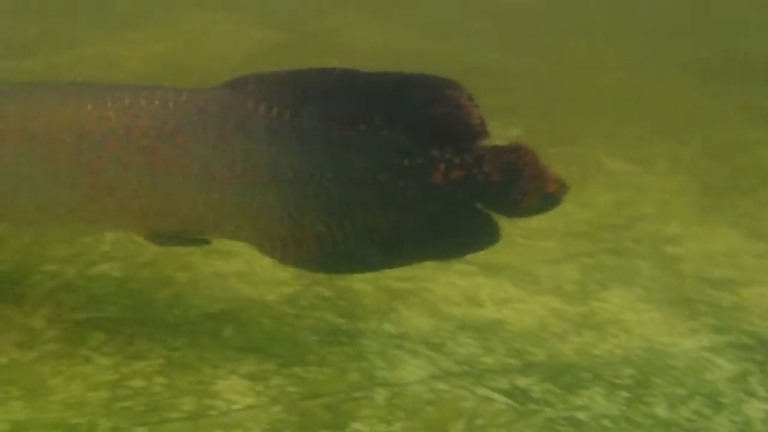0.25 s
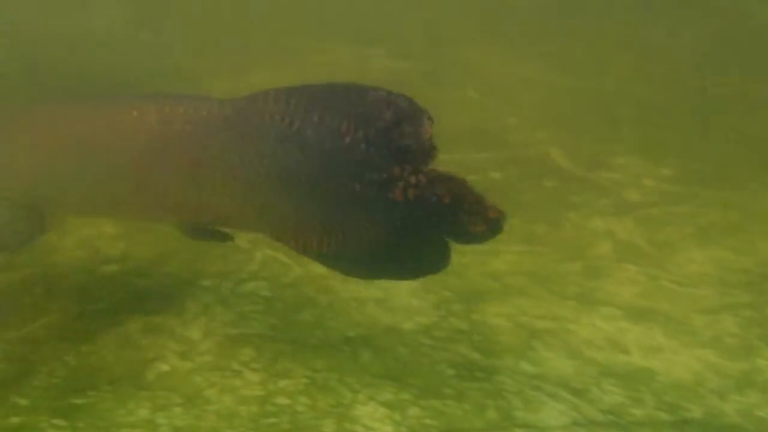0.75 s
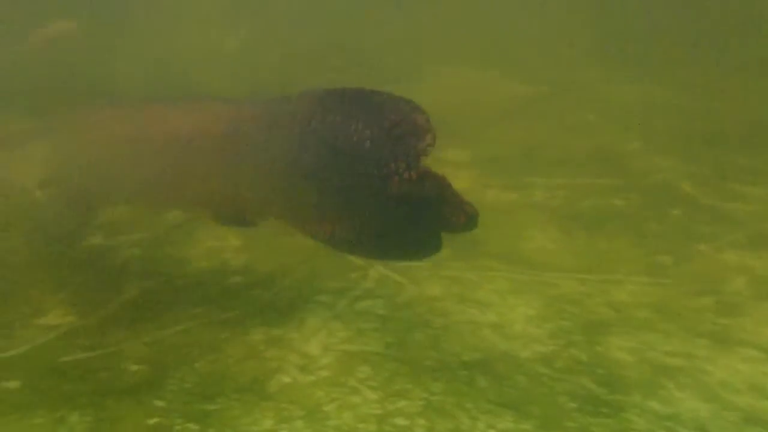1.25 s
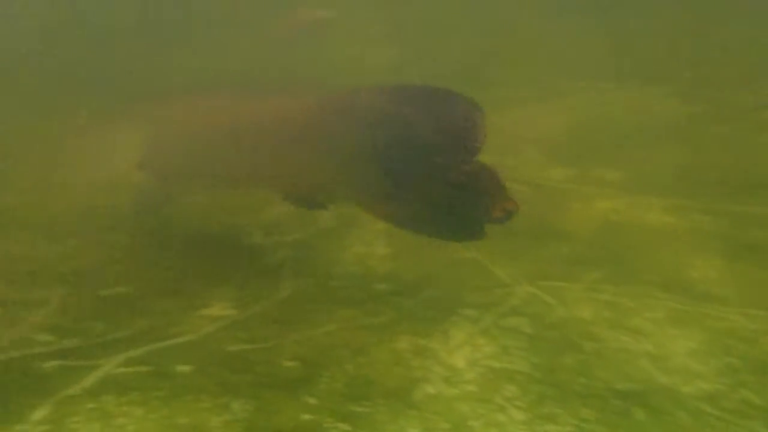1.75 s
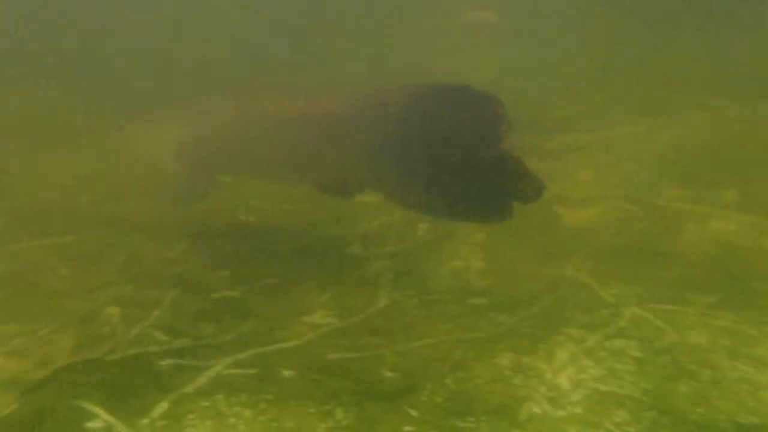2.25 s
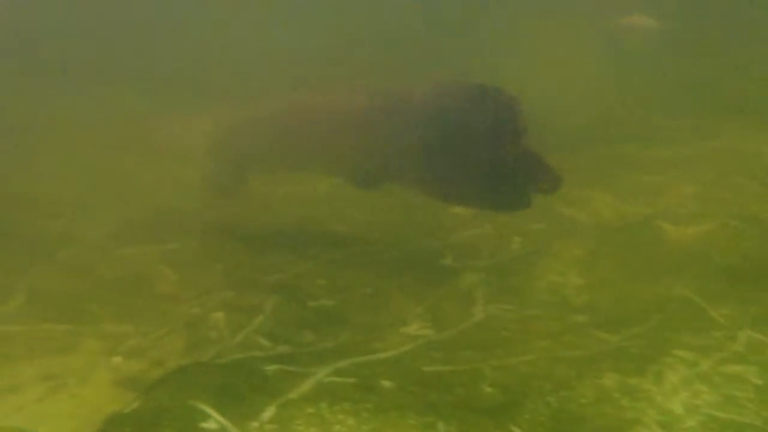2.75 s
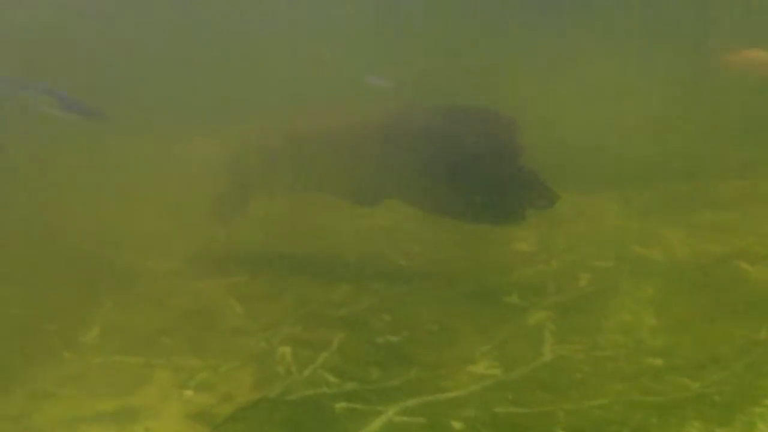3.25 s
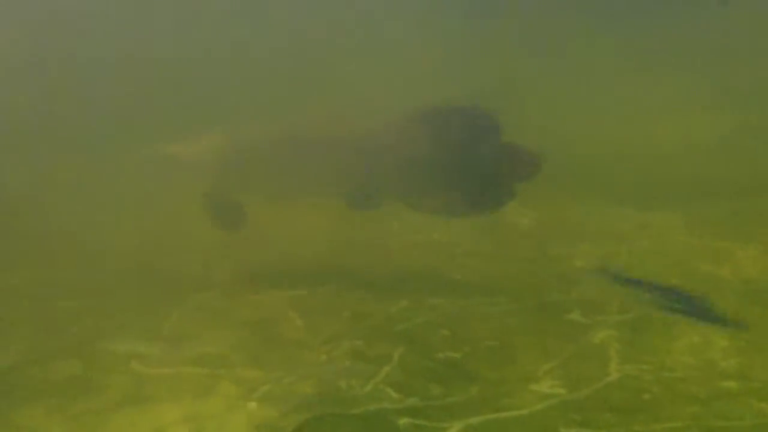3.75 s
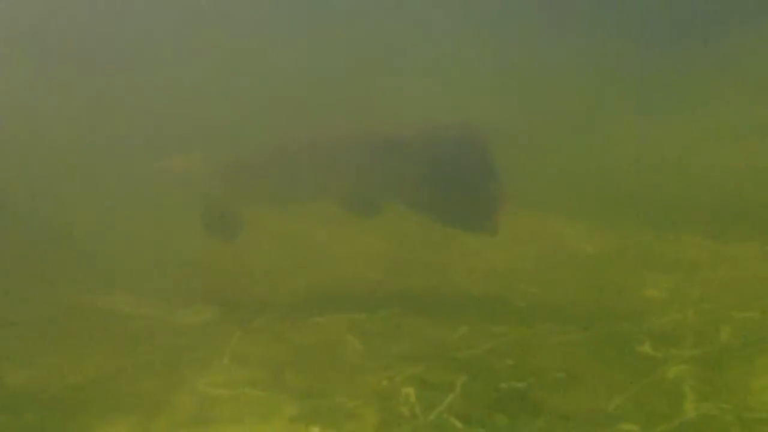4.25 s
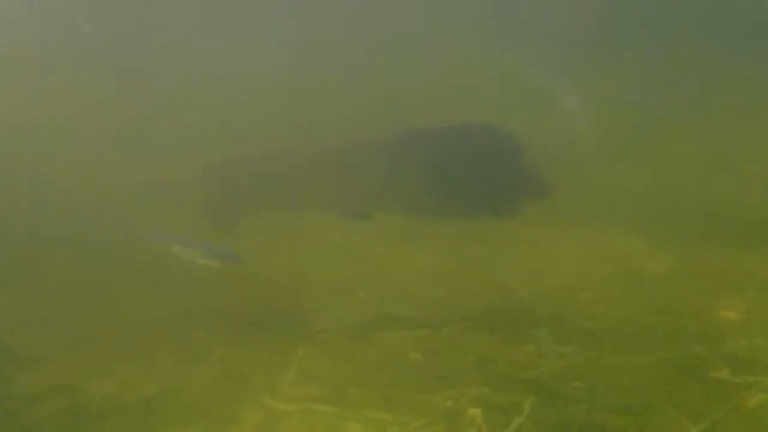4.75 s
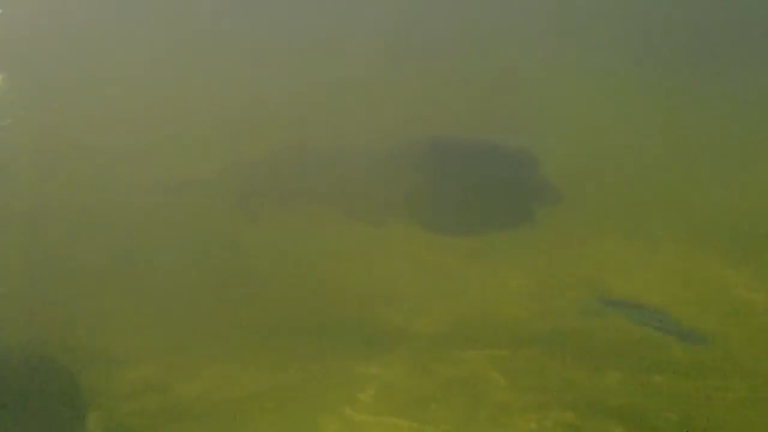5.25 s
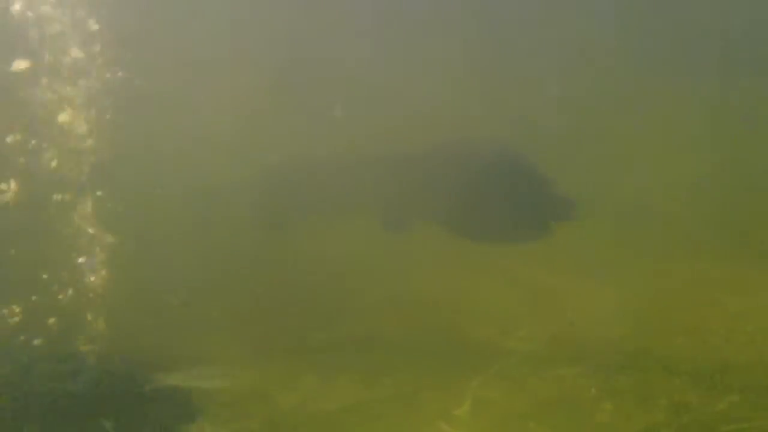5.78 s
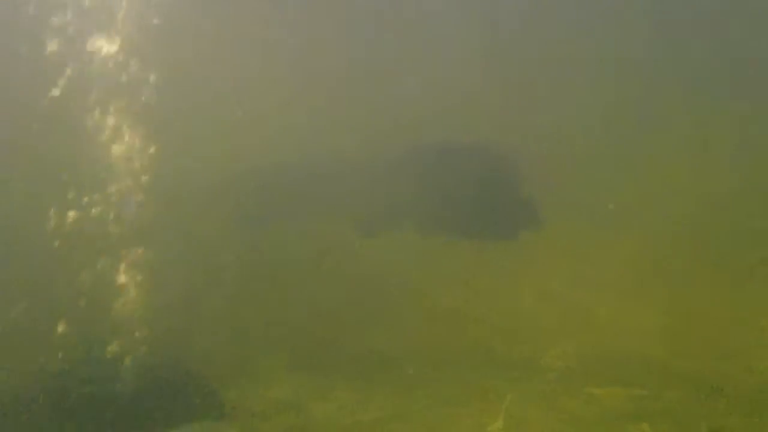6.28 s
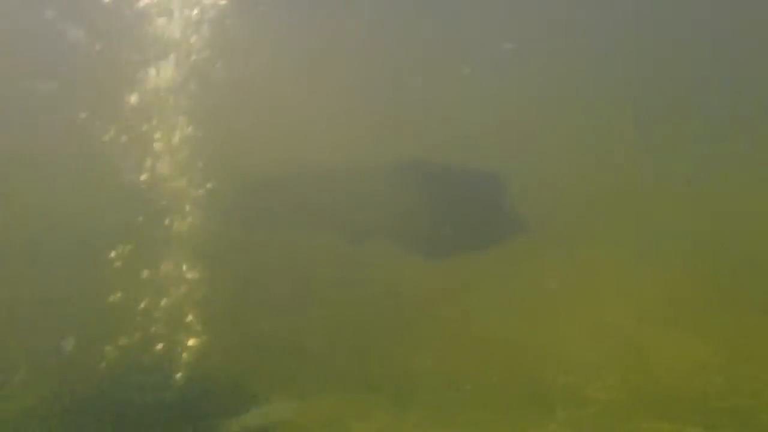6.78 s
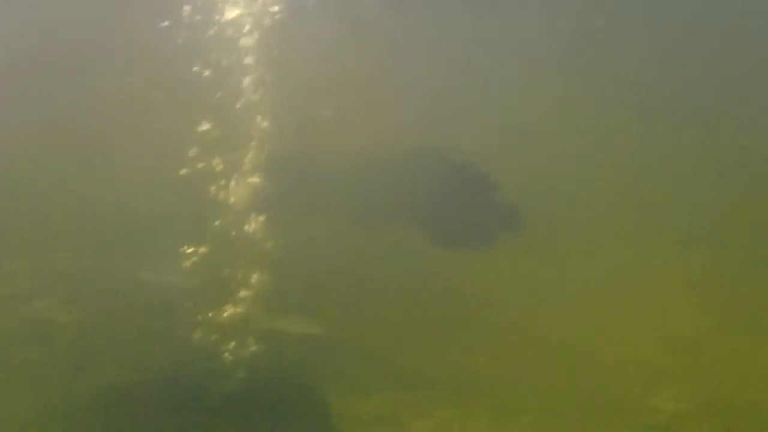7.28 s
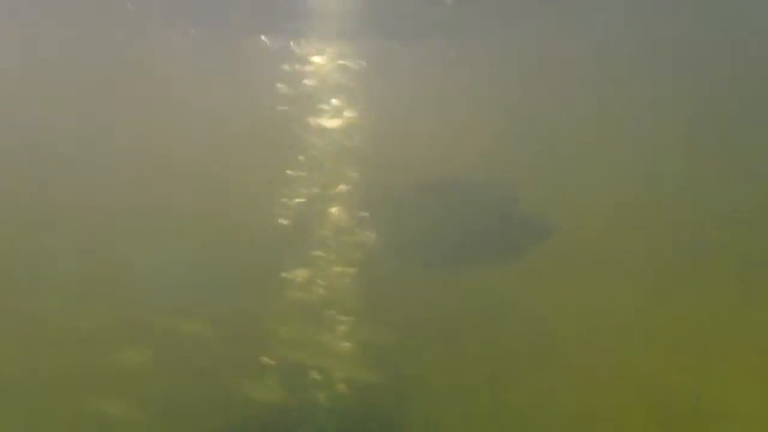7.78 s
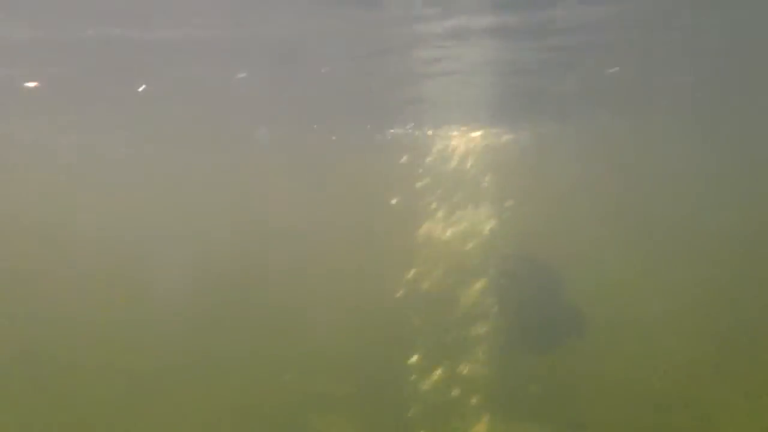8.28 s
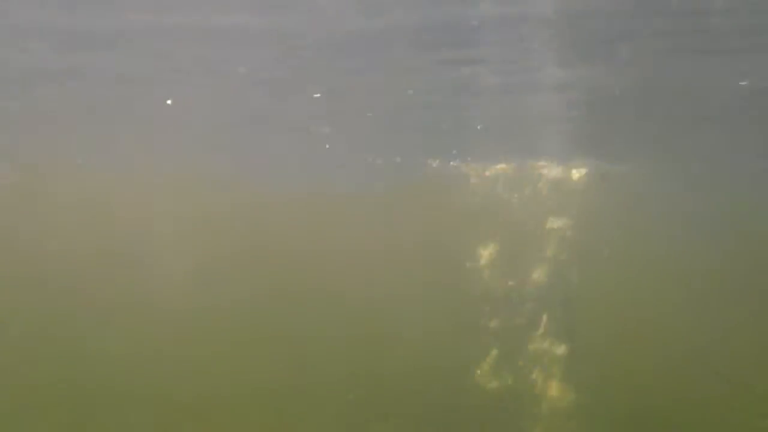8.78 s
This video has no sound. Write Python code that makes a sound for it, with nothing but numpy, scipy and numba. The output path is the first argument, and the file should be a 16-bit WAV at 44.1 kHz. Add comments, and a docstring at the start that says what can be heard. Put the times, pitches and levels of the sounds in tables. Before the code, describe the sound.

A stream of air bubbles rises in a fish tank, heard from a camera held underwater in its housing. Distinct, briefly ringing plinks pop irregularly over a continuous burble and fizz, with a low water rumble beneath. A low motor hums briefly at the start and again near the middle. Fingers bump the case softly, and four sharp knocks land along the way, the last near the end.

```python
"""An aerator's bubble stream in a fish tank, heard from a camera held under water in its housing.
Each bubble rings briefly, echoes between walls and surface and takes on the housing's resonances:
distinct plinks over a bed of burble and fizz. Water rumbles on the case, a motor hums twice,
the electronics hiss faintly, fingers bump the case, and sharp knocks make the limiter duck."""
import sys
import numpy as np
from scipy import signal
from scipy.fft import rfft, irfft
from scipy.io import wavfile
from scipy.ndimage import uniform_filter1d, minimum_filter1d
from numba import njit

SR = 44100
rng = np.random.default_rng(int(sys.argv[2]) if len(sys.argv) > 2 else 0)


def transcribe(signal):
    """Save signal, clipped to [-1, 1], as a 16-bit WAV file at the path in sys.argv[1]."""
    frames = np.atleast_2d(signal).T
    limited = np.clip(frames, -1, 1)
    pcm = np.round(limited * 32767).astype(np.int16)
    wavfile.write(sys.argv[1], SR, pcm)


N = 398223
TIME = np.arange(N) / SR
RING_TIME = np.arange(4096) / SR  # time axis of one short sound or echo tail
TOP_HZ = 14400

# resonances of the housing: (frequency [Hz], width [Hz], level [dB])
HOUSING_MODES = [(1042, 143, -14), (1183.8, 71, 2), (1392, 83, 0.5), (1574, 250, -3.5), (1584, 97, -11),
                 (2054, 138, -15), (2395, 154, -18.5), (2748, 154, -23), (3720, 545, -21),
                 (4280, 500, -23.5), (5490, 990, -21), (6040, 220, -20.5), (7100, 17000, -33.5)]
# steady air flow, its burble easing a little as the camera turns: (time [s], level [dB])
BURBLE_LEVEL = [(0, -26), (2.7, -23.5), (6.5, -25), (9.03, -28)]
# water moving along the case, strongest as the camera swings up at the end: (time [s], flow [dB])
WATER_FLOW = [(0, 3.5), (1.4, 5), (3.2, 0.5), (4.8, -6), (5.6, 2.5), (7.1, 0.5), (7.7, 7), (9.03, 8.5)]
# deep sway of the water: (frequency [Hz], relative level [dB])
SWAY_SPECTRUM = [(8, -2.5), (25, 5.5), (55, -6), (80, -9), (160, -35), (1000, -100)]
# eddies on the case: (frequency [Hz], relative level [dB])
EDDY_SPECTRUM = [(25, -20.5), (65, 5), (115, -1.5), (150, 2.5), (195, -7.5), (240, -13.5), (330, -15),
                 (450, -34.5), (1500, -78.5)]
# midrange slosh: (frequency [Hz], relative level [dB])
SLOSH_SPECTRUM = [(120, -5), (290, -5.5), (420, -4), (620, -4), (850, -4.5), (1300, -3), (4000, -58)]
# runs of the motor: (start [s], end [s], pitch [Hz], hum level [dB])
MOTOR_RUNS = [(0, 0.953, 49.46, -21.5), (3.827, 4.452, 50.5, -26.5)]
# the motor's rattle in the case: (frequency [Hz], relative level [dB])
RATTLE_SPECTRUM = [(40, -16), (100, 2.5), (145, 3), (210, 1), (270, -33.5), (345, -8), (430, -41),
                   (1500, -68.5)]
# faint whine of the electronics: (frequency [Hz], level [dB])
WHINE_TONES = [(8091, -97), (8151.5, -68), (8212, -65), (8273, -78), (8333, -73)]
# their hiss: (frequency [Hz], relative level [dB])
HISS_SPECTRUM = [(100, -8.5), (7000, 1.5), (10000, -1.5), (14000, -1.5)]
# the loudest bubbles, each a distinct plink: (time [s], pitch [Hz], relative peak [dB])
LOUD_BUBBLES = [(0.009, 1210, -9.5), (0.163, 2060, -18.5), (0.183, 1260, -13.5), (0.224, 2200, -20),
                (0.257, 2230, -16), (0.492, 1310, -9.5), (0.728, 1163, -4), (0.742, 1168, -4.5),
                (0.879, 1470, -7.5), (1.145, 2130, -13), (1.266, 2040, -11), (1.266, 2810, -14.5),
                (1.371, 1260, -7.5), (1.401, 1192, -10), (1.443, 1630, -7), (1.579, 1436, -7),
                (1.647, 1226, -10), (1.741, 1213, -11), (1.852, 6080, -16), (2.072, 1650, -8),
                (2.107, 6100, -22), (2.11, 3170, -21), (2.147, 1230, -9.5), (2.18, 1420, -9),
                (2.252, 3200, -19), (2.396, 1557, -1.5), (2.422, 1133, -10.5), (2.468, 1590, -4.5),
                (2.662, 1375, -9), (2.697, 1180, -13.5), (2.713, 2100, -15.5), (2.715, 1410, -12.5),
                (2.821, 1525, -11.5), (2.935, 1550, -9.5), (3.094, 1860, -11), (3.175, 1530, -10),
                (3.219, 1190, -11), (3.222, 1860, -9), (3.253, 1630, -8), (3.391, 1420, -11),
                (3.461, 1110, -12.5), (3.499, 1185, -2.5), (3.555, 1064, -6), (3.631, 1180, -6.5),
                (3.918, 2710, -20), (3.995, 6370, -22), (4.032, 3930, -23.5), (4.044, 1570, -13),
                (4.082, 2480, -8.5), (4.349, 1590, -13), (4.401, 1360, -12), (4.437, 5800, -23.5),
                (4.632, 6230, -23), (4.761, 1770, -12.5), (4.786, 1414, -8), (4.895, 1760, -5),
                (5.238, 1620, -11.5), (5.324, 4740, -17.5), (5.482, 1450, -14), (5.87, 1240, -10),
                (5.876, 3440, -21.5), (5.974, 3250, -19.5), (6.021, 1197, -10.5), (6.103, 1193, -5),
                (6.196, 3350, -20.5), (6.237, 1586, -14.5), (6.275, 1540, -8), (6.281, 1130, -11),
                (6.327, 1112, -11.5), (6.361, 1308, -5.5), (6.558, 1770, -5), (6.622, 1810, -2.5),
                (6.768, 1190, -12.5), (6.941, 1148, -9), (7.066, 1550, -13.5), (7.097, 1150, -10),
                (7.192, 1164, -10.5), (7.208, 1990, -19), (7.297, 2150, -19), (7.371, 1550, -12.5),
                (7.406, 1500, -10), (7.686, 2320, -14.5), (7.689, 1387, -4.5), (7.795, 1134, -8.5),
                (8.11, 1440, -9), (8.182, 1187, -15), (8.415, 4520, -15.5), (8.458, 5800, -17.5),
                (8.461, 1356, -12.5), (8.605, 1664, -13.5), (8.648, 1290, -10), (8.856, 3620, -17.5),
                (8.862, 1560, -13.5)]
# three sizes of lesser bubbles leaving the aerator:
# (rate [1/s], lowest pitch [Hz], highest pitch [Hz], relative peak at the lowest pitch [dB])
BUBBLE_SIZES = [(10, 1130, 1726, -16.5), (12, 1910, 3610, -22), (4, 5660, 6440, -30)]
# sharp knocks on the housing:
# (time [s], strength [dB], pitch [Hz], t60 [s], tick [dB re the ring], thud [dB re the ring])
CASE_KNOCKS = [(0.9357, 4, 1400, 0.022, -8, -6), (4.3007, -0.5, 1440, 0.015, -21, -23),
               (7.6009, 6, 1340, 0.021, -1.5, -8), (8.9195, 3.5, 1210, 0.004, -8, -4)]
# soft bumps of the hand on the case: (time [s], relative peak [dB], low-pass cutoff [Hz])
HAND_BUMPS = [(1.129, -17.5, 267), (2.06, -25.5, 500), (2.378, -17, 285), (2.937, -17.5, 320),
              (3.371, -26.5, 754), (3.818, -19.5, 446), (4.735, -25, 1000), (5.15, -17, 900),
              (5.158, -14, 403), (5.189, -18.5, 460), (5.644, -20, 420), (5.969, -19, 340),
              (6.547, -18.5, 202), (7.002, -18, 397), (7.339, -22.5, 302), (7.527, -20, 500),
              (7.551, -15.5, 282), (7.808, -18.5, 410), (7.866, -17, 360), (8.719, -19, 800),
              (8.776, -15.5, 700), (8.927, -7, 457), (8.975, -17, 260)]


def undb(db):
    """Decibels to gain."""
    return 10 ** (np.asarray(db) / 20)


def level(x, db):
    """Set the rms level."""
    return x * undb(db) / np.sqrt(np.mean(x ** 2))


def curve(table):
    """Automation: straight ramps between (time [s], value) points."""
    return np.interp(TIME, *np.transpose(table))


def add(out, s, x):
    """Mix x in at time s."""
    i = int(np.clip(s * SR, 0, N - 1))
    out[i:i + len(x)] += x[:N - i]


def wander(rate_hz):
    """Smooth random modulation with a spread near 1."""
    hold = max(int(SR / rate_hz), 1)
    steps = np.repeat(rng.standard_normal(N // hold + 1), hold)
    return 1.52 * uniform_filter1d(steps, hold)[:N]


def noise(spectrum):
    """Noise at unit rms, coloured by (frequency [Hz], level [dB]) points."""
    hz, db = np.transpose(spectrum)
    f = np.maximum(np.fft.rfftfreq(N, 1 / SR), 1)
    colour = undb(np.interp(np.log(f), np.log(hz), db))
    return level(irfft(rfft(rng.standard_normal(N)) * colour, N), 0)


def ping(hz, cycles, glide=0, rise=.3):
    """A damped tone: it swells in `rise` cycles and falls 60 dB in `cycles` while its pitch glides."""
    age = np.arange(int(cycles * SR / hz) + 2) * hz / SR  # in cycles
    swell = 1 - np.exp(-age / rise)
    tone = np.sin(2 * np.pi * age * (1 + glide * age / cycles / 2))
    return swell * tone * np.exp(-np.log(1000) * age / cycles)


def housing(leak_db=-52):
    """Impulse response of the case: steep resonances over a weak, broad leak."""
    size = len(RING_TIME)
    f = np.fft.rfftfreq(size, 1 / SR)
    power = undb(leak_db) ** 2 / (1 + (f / 7500) ** 4)
    for hz, width, db in HOUSING_MODES:
        power += undb(db) ** 2 / (1 + 2 * ((f - hz) / width) ** 2) ** 2
    cepstrum = irfft(np.log(power))[:size // 2]  # minimum phase: no ring ahead of the attack
    cepstrum[0] /= 2
    return irfft(np.exp(rfft(cepstrum, size)))[:size // 2]


def tank(wet_db, t60):
    """Reverb from one spot in the water: the direct path, then echoes off walls and surface."""
    decay = np.exp(-np.log(1000) * RING_TIME / t60) * (RING_TIME > .003)
    paths = rng.standard_normal(len(RING_TIME)) ** 3 * decay
    paths *= undb(wet_db) / np.linalg.norm(paths)
    paths[0] = 1
    return paths


def swarm(case, low_hz, high_hz, rate, spread_db, cycles, wet_db, t60, spots=8):
    """Countless weak bubbles from several spots in the column; small ones ring higher and shorter."""
    out = np.zeros(N)
    for _ in range(spots):
        spot = np.zeros(N)
        for when, pitch, strength in rng.random((int(rate * N / SR / spots), 3)):
            hz = low_hz * (high_hz / low_hz) ** pitch
            gain = hz * undb(spread_db * strength ** 3)
            add(spot, when * N / SR, gain * ping(hz, cycles, glide=0.035, rise=0.47))
        out += signal.oaconvolve(spot, tank(wet_db, t60))[:N]
    return level(signal.oaconvolve(out, case)[:N], 0)


def bubble_stream(case, fizz_db=-45.5, pops_db=-61.5):
    """The bed: the column burbles and fizzes in uneven gushes; tiny bubbles pop close to the case."""
    burble = swarm(case, 885, 3337, rate=480, spread_db=11, cycles=31, wet_db=1, t60=0.09)
    fizz = swarm(case, 2185, 7760, rate=300, spread_db=14, cycles=20.4, wet_db=2, t60=0.12)
    pops = swarm(case, 6560, 11000, rate=85, spread_db=5, cycles=12, wet_db=2, t60=0.045, spots=2)
    gush = undb(1.7 * wander(34))
    return gush * (burble * undb(curve(BURBLE_LEVEL)) + fizz * undb(fizz_db)) + pops * undb(pops_db)


def water_rumble(sway_db=-33, eddy_db=-31, slosh_db=-47):
    """Water sways, eddies press on the case and slosh comes in rough spurts; all grow with the flow."""
    surge_db = 1.4 * wander(14)
    spurts_db = 2.8 * wander(25) + 2.6 * wander(140)
    flow_db = curve(WATER_FLOW)
    sway = noise(SWAY_SPECTRUM) * undb(sway_db + flow_db)
    eddies = noise(EDDY_SPECTRUM) * undb(eddy_db + 0.26 * flow_db + surge_db)
    slosh = noise(SLOSH_SPECTRUM) * undb(slosh_db + 0.29 * flow_db + spurts_db)
    return sway + eddies + slosh


def motor(rattle_db=-8, fade_s=0.059):
    """A low, slightly wavering hum with a weak octave; it rattles in the case."""
    out = np.zeros(N)
    for start, end, hz, db in MOTOR_RUNS:
        running = np.clip(np.minimum(TIME - start, end - TIME) / fade_s, 0, 1)
        phase = 2 * np.pi * np.cumsum(hz * (1 + 0.0044 * wander(17))) / SR
        hum = np.sin(phase) + undb(-9.5) * np.sin(2 * phase)
        out += running * (level(hum, db) + undb(db + rattle_db) * noise(RATTLE_SPECTRUM))
    return out


def electronics(hiss_db=-56):
    """The camera's noise floor: hiss and a thin whine."""
    whine = sum(undb(db) * np.sqrt(2) * np.sin(2 * np.pi * (hz * TIME + rng.random()))
                for hz, db in WHINE_TONES)
    return whine + undb(hiss_db) * noise(HISS_SPECTRUM)


def lesser_bubbles(beats=200, fall_db_per_octave=5, scatter_db=2.5):
    """Cues for softer plinks: the aerator frees a bubble somewhere in each beat; smaller is weaker."""
    cues = []
    for rate, low_hz, high_hz, db in BUBBLE_SIZES:
        late, pitch = rng.random((beats, 2)).T
        octaves = pitch * np.log2(high_hz / low_hz)
        peak_db = db - fall_db_per_octave * octaves + scatter_db * rng.standard_normal(beats)
        cues += zip((np.arange(beats) + late) / rate, low_hz * 2 ** octaves, peak_db)
    return [cue for cue in cues if cue[0] < N / SR]


def plinks(case, cues, trim_db=0.6, fragments=7, fragment_db=-13, scatter_s=.018, span_octaves=1.49):
    """Single bubbles ring and shed smaller, higher ones as they break; all echo and ring the case."""
    out = np.zeros(N)
    for s, hz, db in cues:
        burst = np.zeros(len(RING_TIME))
        for delay, pitch in rng.random((fragments, 2)):
            fragment_hz = min(hz * 2 ** (span_octaves * pitch ** 2), TOP_HZ)
            fragment = undb(fragment_db) * ping(fragment_hz, cycles=18, rise=0.54)
            add(burst, delay * scatter_s, fragment)
        t60 = 0.027 * (1400 / hz) ** 0.82  # higher bubbles die sooner
        cycles = hz * t60
        add(burst, 0, ping(hz, cycles, glide=0.018, rise=cycles / 20))  # long rings swell more slowly
        echoed = signal.fftconvolve(burst, tank(wet_db=-3, t60=0.057))
        plink = signal.fftconvolve(echoed, case)
        add(out, s, plink / np.abs(plink).max() * undb(db + trim_db))
    return out


def knocks():
    """Hard hits ring the case briefly, with a thud below and a bright tick on top."""
    out = np.zeros(N)
    for s, db, hz, t60, tick_db, thud_db in CASE_KNOCKS:
        add(out, s, undb(db) * ping(hz, cycles=hz * t60, rise=.15))
        add(out, s, undb(db + thud_db) * ping(600, cycles=1.8, rise=.15))
        add(out, s, undb(db + tick_db) * ping(4100, cycles=1.23, rise=.14))
    return out


def finger_bumps(trim_db=2, weight_hz=130, decay_s=0.0074):
    """The hand on the case gives dull, rough thuds, heaviest in the bass."""
    out = np.zeros(N)
    for s, db, cutoff_hz in HAND_BUMPS:
        rub = rng.standard_normal(len(RING_TIME)) * np.exp(-RING_TIME / decay_s)
        push = signal.lfilter(*signal.butter(1, weight_hz, fs=SR), rub)
        thud = signal.sosfilt(signal.butter(3, cutoff_hz, fs=SR, output="sos"), push)
        add(out, s, undb(db + trim_db) * thud / np.abs(thud).max())
    return out


def scene():
    """The mono mix at the microphone: bed, plinks and handling."""
    case = housing()
    bed = bubble_stream(case) + water_rumble() + motor() + electronics()
    bubbles = plinks(case, LOUD_BUBBLES + lesser_bubbles())
    return (bed + bubbles + knocks() + finger_bumps())[None]


@njit
def follow(x, attack, release):
    """Peak follower: rises fast, sinks slowly."""
    envelope, peak = np.empty(len(x)), 0.
    for i in range(len(x)):
        peak += (x[i] - peak) * attack if x[i] > peak else -peak * release
        envelope[i] = peak
    return envelope


def record(dry, limit_db=-9, attack_s=0.00066, release_s=0.2):
    """The limiter looks just ahead and ducks for loud peaks; overshoot is rounded, the top is cut."""
    envelope = follow(np.abs(dry[0]), 1 / (attack_s * SR), 1 / (release_s * SR))
    gain = 1 / np.maximum(envelope / undb(limit_db), 1)
    ducked = dry * uniform_filter1d(minimum_filter1d(gain, size=12), size=12)
    rounded = ducked / (1 + ducked ** 4) ** (1 / 4)
    return signal.sosfilt(signal.ellip(8, .2, 70, TOP_HZ, fs=SR, output="sos"), rounded)


dry = scene()
out = record(dry)
transcribe(out)
```